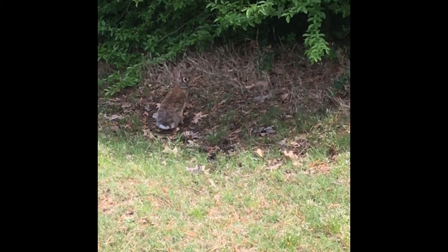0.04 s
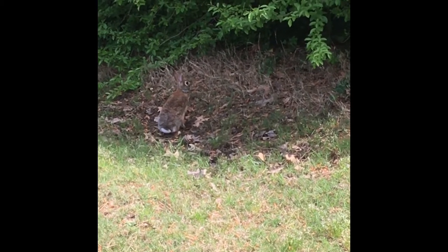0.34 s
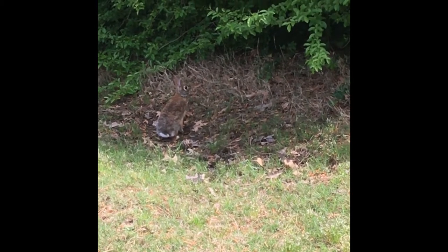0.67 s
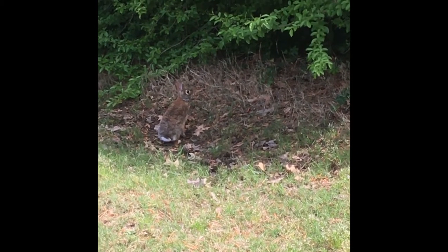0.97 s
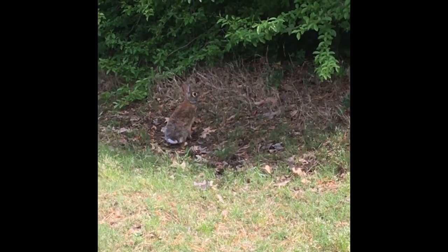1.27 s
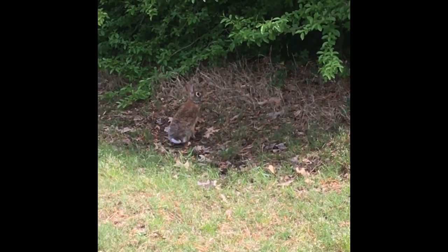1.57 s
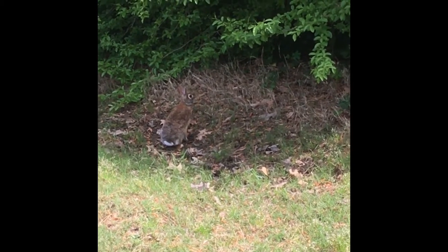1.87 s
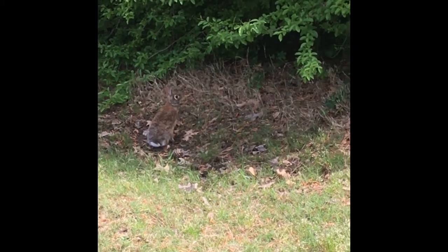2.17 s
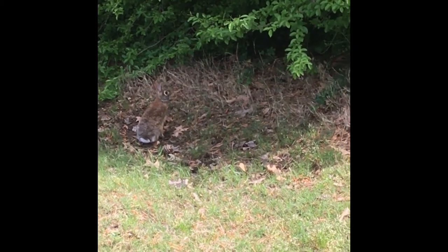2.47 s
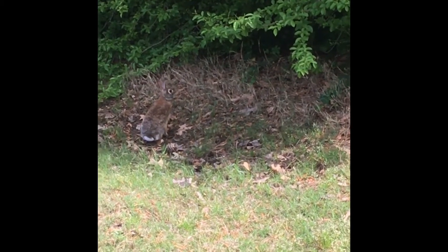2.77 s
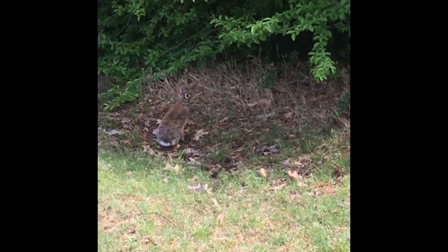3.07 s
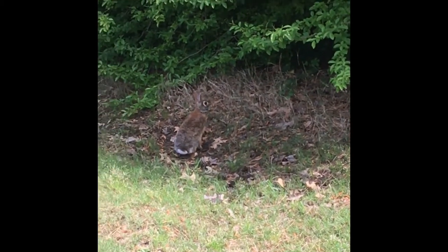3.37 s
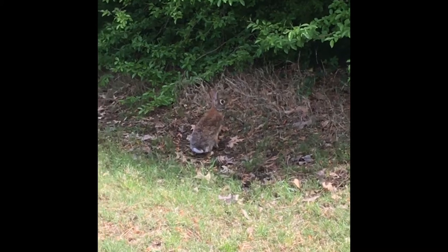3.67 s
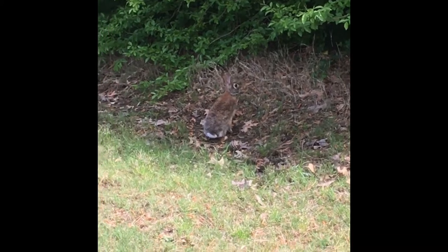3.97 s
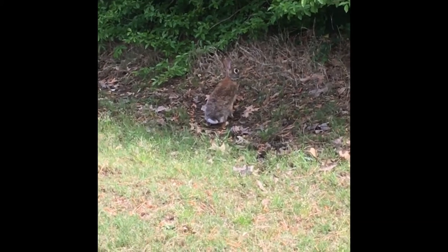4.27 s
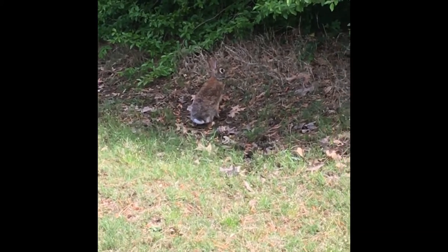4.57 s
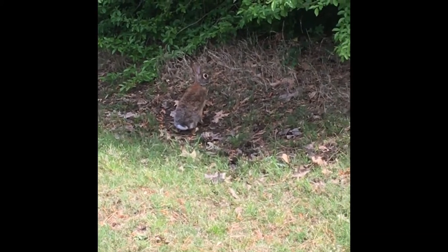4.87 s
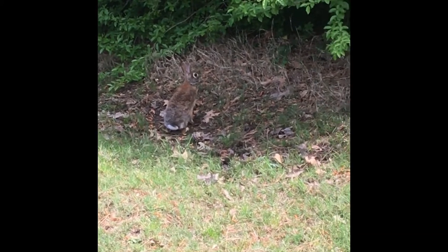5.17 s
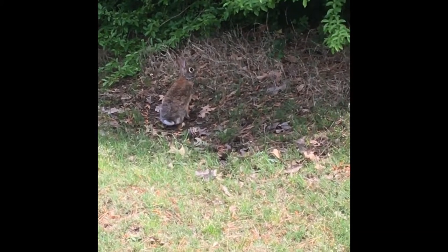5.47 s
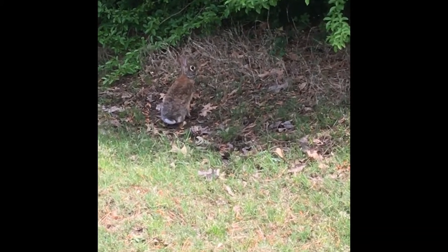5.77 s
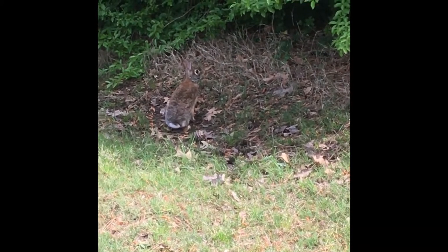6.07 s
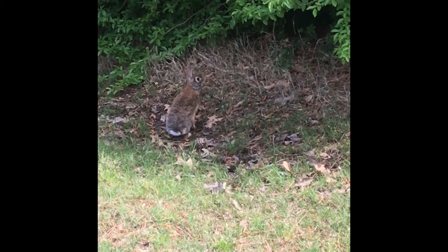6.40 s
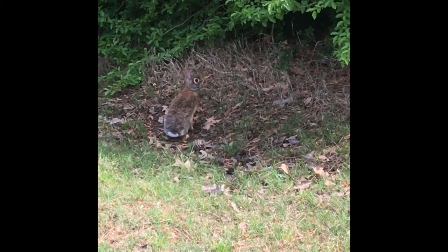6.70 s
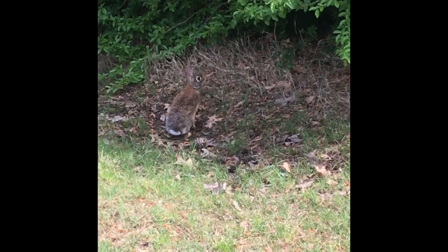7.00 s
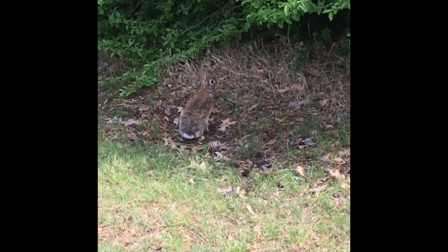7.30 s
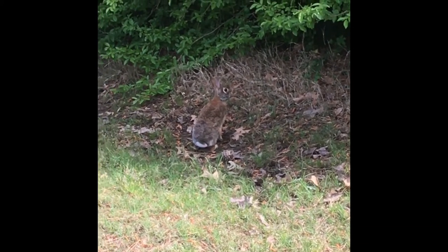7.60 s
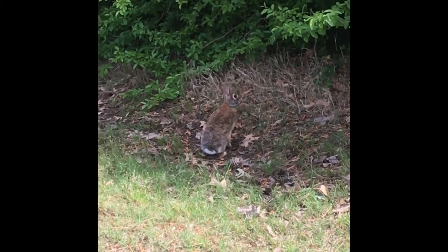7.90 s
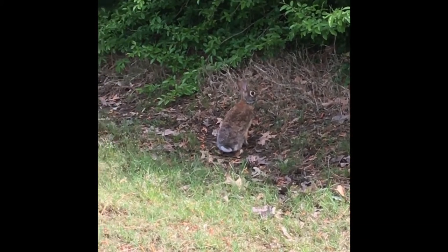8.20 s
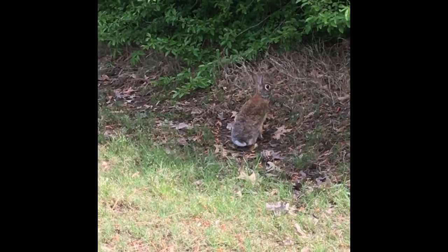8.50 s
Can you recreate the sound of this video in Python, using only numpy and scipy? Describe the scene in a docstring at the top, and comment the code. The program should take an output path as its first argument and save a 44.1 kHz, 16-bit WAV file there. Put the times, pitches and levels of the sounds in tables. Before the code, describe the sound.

A distant riding mower hums throughout, low and steady, over a soft outdoor rumble and faint hiss. From about 4.5 seconds its pitch sags slightly; it gets quieter around 6 seconds, and the pitch partly recovers by 7.3. Small birds chip, whistle and buzz faintly all along, with a slight echo from the trees. A nearer bird gives a thin, very high call at 0.5 seconds and a weaker one at 5.7. From 6 to 7 seconds another sings a quick trill of seven syllables. Close to the microphone, a wristwatch makes a small dry tick once a second, starting at 0.25 seconds. The hand holding the microphone makes soft, deep bumps in the first second and again from 2 to 4 seconds. Light finger rubbing starts at about 2.5 seconds and continues, with a few small clicks, clearest near 3, 5.2 and 7.7 seconds.

```python
"""A riding mower hums far across a garden: its blades and engine slow a little in thicker grass.
Small birds chip, whistle, buzz and trill in gliding tones, which the trees scatter.
Close by, a wristwatch ticks once a second as its second hand steps. Fingers bump and rub
the hand-held microphone, over a low rumble and a faint hiss."""
import sys
import numpy as np
from scipy import signal
from scipy.fft import rfft, irfft, next_fast_len
from scipy.io import wavfile

SR = 44100
rng = np.random.default_rng(int(sys.argv[2]) if len(sys.argv) > 2 else 0)


def unload_wav(signal):
    """Save mono or channel-first audio to the path in sys.argv[1] as 16-bit WAV at rate SR, clipped to [-1, 1]."""
    wavfile.write(
        sys.argv[1],
        SR,
        np.round(np.clip(np.atleast_2d(signal).T, -1, 1) * 32767).astype(np.int16),
    )


N = 381465
TIME = np.arange(N) / SR

# low rumble (frequency [Hz], relative level [dB])
RUMBLE_SPECTRUM = [(12, -48), (24, -14.5), (36, -8), (52, 0), (75, -2.5), (92, -7), (115, 0.5),
                   (145, -11.5), (175, -11.5), (220, -16.5), (280, -21.5), (400, -33.5), (700, -63)]
# roar of the mower deck and the open air (frequency [Hz], relative level [dB])
ROAR_SPECTRUM = [(100, -19), (330, 2.5), (480, -2), (640, 1), (780, -2), (980, 2), (1300, -2.5),
                 (1750, -7.5), (2400, -11.5), (3200, -19), (4200, -21.5), (5000, -30), (9000, -32.5)]
# microphone hiss (frequency [Hz], relative level [dB])
HISS_SPECTRUM = [(2000, -4), (4900, -7.5), (5700, 0), (6500, 3.5), (7300, -1.5), (8200, -6.5), (9300, -5.5),
                 (10000, -9), (10500, -22.5), (11400, -10.5), (12200, -12), (15800, -18)]

# fingers rubbing the housing (frequency [Hz], relative level [dB])
RUB_SPECTRUM = [(300, 0), (1100, 9), (2500, 1), (4800, -3), (6500, 2), (8200, -10.5), (9500, -11),
                (10600, -19.5), (15800, -22)]
# finger slides (start [s], length [s], level [dB], added brightness [dB per octave])
FINGER_SLIDES = [(2.56, 0.79, -67.5, -0.5), (3.347, 0.65, -74.5, 4.5), (4.58, 0.49, -75, -1),
                 (5.42, 0.75, -71.5, .5), (7.47, .42, -65, -2)]
# soft bumps of the hand (start [s], length [s], level [dB], treble cutoff [Hz])
HAND_BUMPS = [(-.08, 0.26, -40.5, 181), (.45, 0.15, -42, 80), (.778, .15, -42, 50), (2.15, 0.82, -44.5, 55),
              (2.962, 0.16, -37, 65), (3.15, 0.99, -43.5, 70)]
# clicks of the housing (time [s], peak level [dB], centre frequency [Hz])
HOUSING_CLICKS = [(2.653, -44.5, 7360), (2.888, -45, 1100), (3.031, -43, 1700), (3.394, -50.5, 4500),
                  (5.191, -44, 4200), (7.739, -40.5, 1500), (8.374, -51, 5050)]
# one watch tick (frequency [Hz], relative level [dB])
TICK_SPECTRUM = [(1500, -41), (3000, -18), (3800, -9), (4800, -25), (5600, -11), (6300, 1.5), (7700, -5),
                 (8400, -11), (9200, -10), (11000, -16), (13400, -30), (14500, -15), (16000, -23)]

# the farthest birds (pitch [Hz], notes [per s], base level [dB])
CHORUS_BIRDS = [(2315, 15, -78.5), (2680, 10, -79.5), (3400, 18, -80.5), (4040, 9, -86.5)]
# how their chorus swells and fades (time [s], added level [dB])
CHORUS_SWELL = [(0, 2.5), (1.6, -1), (2.6, -2.5), (4.5, 2), (5.3, -5), (7.2, -2.5), (8.65, 5)]
# far chips (start [s], middle pitch [Hz], fall [octaves], level [dB])
BIRD_CHIPS = [(.01, 2780, 0.32, -69.5), (.385, 3400, .35, -80), (.68, 4100, 0.16, -78),
              (1.355, 2670, .16, -73), (1.47, 2720, 0.37, -69.5), (1.605, 2580, 0.18, -74),
              (2.135, 4500, .1, -76.5), (2.213, 3500, 0.28, -72.5), (2.263, 2270, 0.11, -68),
              (2.305, 3240, 0.2, -71.5), (2.47, 2270, 0.21, -69), (3.425, 2760, 0.38, -74.5),
              (5.893, 4050, 0.47, -68), (5.998, 4070, .4, -71), (6.025, 2077, .1, -68),
              (7.822, 3050, .28, -74), (8.15, 3040, .3, -74)]
# far whistles (start [s], length [s], held pitch [Hz], start above that pitch [octaves], level [dB])
BIRD_WHISTLES = [(0.562, 0.038, 2270, 0, -70), (.79, .03, 2800, 0, -72), (.975, .05, 2240, -0.036, -70),
                 (1.622, .028, 3600, -.05, -73), (1.788, .065, 3580, -.2, -77),
                 (2.94, 0.048, 2550, -0.021, -73), (3.52, 0.087, 2260, 0.036, -71.5),
                 (3.995, 0.11, 2340, 0.18, -70.5), (4.39, .13, 3370, .19, -82),
                 (4.51, .14, 2410, 0.3, -73.5), (4.658, 0.036, 2365, .04, -63),
                 (4.842, .04, 2760, 0.019, -69.5), (4.891, .19, 2775, 0, -78.5),
                 (6.235, .16, 4440, 0.075, -72.5), (6.4, .09, 4450, 0, -82), (6.57, .13, 4320, 0, -80),
                 (7.355, 0.032, 4200, -0.021, -72), (7.468, .032, 4420, 0, -72),
                 (7.99, 0.11, 3202, 0.09, -73)]
# far buzzy calls (start [s], length [s], middle pitch [Hz], level [dB])
BIRD_BUZZES = [(0.629, .15, 2960, -73), (2.718, 0.22, 4270, -78.5), (3.249, 0.082, 3430, -74),
               (5.607, .069, 4180, -74), (7.151, 0.184, 3550, -71.5), (7.269, 0.14, 3290, -74.5),
               (8.299, 0.11, 3360, -76)]
# the notes in one syllable of the trill
# (delay [s], length [s], start pitch [Hz], middle pitch [Hz], end pitch [Hz], added level [dB])
TRILL_NOTES = [(-.005, 0.0325, 3330, 3400, 3170, -2.5), (0.013, 0.0208, 3295, 2946, 2400, 1.5),
               (0.049, .016, 2850, 2720, 2540, -4), (0.068, .032, 3530, 3957, 4130, 2),
               (.108, 0.028, 4100, 4090, 4060, -12)]
# the near bird's calls
# (start [s], length [s], base pitch [Hz], climb [share of pitch], level [dB], level change [dB])
HEDGE_CALLS = [(.519, .104, 6700, .1, -63.5, -4), (5.708, .104, 6600, 0.23, -71, -17)]

# the mower cruises, sags in thicker grass and partly recovers (time [s], blade-passing rate [Hz])
BLADE_RATE = [(0, 129.7), (4.35, 129.9), (6.7, 126.1), (7.3, 128.1), (8.65, 128.1)]
# the hum comes up, slowly recedes, then drops (time [s], level [dB])
HUM_LEVEL = [(0.0, -40.5), (0.46, -35.5), (5.59, -38), (6.24, -43.5), (8.65, -43.5)]
# sound bouncing off the ground cancels and restores the hum's octave (time [s], added level [dB])
GROUND_BOUNCE = [(0, -5), (.7, 4), (3.5, 0.5), (4.6, -1.5), (5.4, -7), (6.6, -4), (7.4, 5), (8.65, 4.5)]
# blade tones; a negative share makes a tone grow as the hum fades
# (multiple of the blade rate, base level [dB], share of the hum's fading, waver [0-1])
BLADE_TONES = [(1, -36, 1, 0.05), (2, -61, 0.74, 0.1), (3, -67.5, 0.52, 0.13), (4, -76.5, -0.094, 0.1),
               (5, -75.5, -0.51, 0.8), (6, -86, -0.13, 0.2), (7, -78, 0.21, 0.6), (8, -82.5, -.5, 0.8)]
# exhaust tones (multiple of the engine cycle, base level [dB], share of the hum's fading, waver [0-1])
EXHAUST_TONES = [(2, -47.5, .8, 0.17), (3, -57, -0.29, 0.2), (4, -71.5, -0.11, 0.4), (5, -59, -0.44, 0),
                 (6, -66, -0.42, 0.7), (8, -76.5, -0.17, 0.9), (48, -78.5, .5, 0.9), (54, -80.5, 1, 0.7)]


def amp(db):
    """Turns decibels into a gain to multiply by."""
    return 10 ** (np.asarray(db) / 20)


def unit_rms(x):
    """Scales a signal so its average strength (rms) is 1."""
    return x / np.sqrt(np.mean(abs(x) ** 2) + 1e-30)


def curve(rows):
    """Joins (time, value) rows by straight lines."""
    return np.interp(TIME, *np.transpose(rows))


def gain_at(spectrum, hz):
    """Reads a (frequency, level) table as a gain at the given frequencies."""
    f, db = np.transpose(spectrum)
    return amp(np.interp(np.log(hz + 1), np.log(f), db))


def noise(shape):
    """Noise of strength 1 whose spectrum follows shape(frequency)."""
    size = next_fast_len(N)
    spectrum = rfft(rng.standard_normal(size)) * shape(np.fft.rfftfreq(size, 1 / SR))
    return unit_rms(irfft(spectrum, size)[:N])


def drift(rate):
    """A random wobble, up to about rate changes a second."""
    return noise(lambda f: np.exp(-(f / rate) ** 2))


def band(hz, width_hz):
    """Noise gathered around one frequency."""
    return noise(lambda f: 1 / (1 + (2 * (f - hz) / width_hz) ** 2))


def swell(start, length):
    """One smooth rise and fall."""
    return np.sin(np.pi * np.clip((TIME - start) / length, 0, 1))


def note_time(length):
    """Time in seconds through a note."""
    return np.arange(int(length * SR)) / SR


def sweep(length, hz, octaves):
    """A pitch that moves evenly by so many octaves, passing hz halfway."""
    return hz * 2 ** (octaves * (note_time(length) / length - .5))


def add(mix, start, sound):
    """Mixes a sound in at a start time in seconds."""
    part = mix[max(round(start * SR), 0):][:len(sound)]
    part += sound[:len(part)]


def snap(gain, size=1024):
    """The shortest click with the spectrum gain(frequency), peaking at 1."""
    log_gain = np.log(gain(abs(np.fft.fftfreq(size, 1 / SR))) + 1e-5)
    spectrum = np.exp(np.conj(signal.hilbert(log_gain)))  # packs the energy at the start
    click = np.fft.ifft(spectrum).real
    return click / abs(click).max()


def rumble_and_roar(gust_db=.74, flutter_db=.5):
    """A low rumble swells gently under the far roar of the mower deck and the open air."""
    rumble = amp(-50 + gust_db * drift(.89)) * noise(lambda f: gain_at(RUMBLE_SPECTRUM, f))
    roar = amp(-60.5 + flutter_db * drift(16)) * noise(lambda f: gain_at(ROAR_SPECTRUM, f))
    return rumble + roar


def microphone_hiss(fizz_db=3.5, flicker_db=2.5, dip_db=-7):
    """The microphone's own fizzy hiss, with a thin whine and a flickering shimmer that dips once."""
    hiss = amp(-77 + fizz_db * drift(260)) * noise(lambda f: gain_at(HISS_SPECTRUM, f))
    whine = amp(-90) * band(5480, width_hz=27)
    in_dip = (TIME > 2.7) & (TIME < 4.25)
    flicker = amp(flicker_db * band(11, width_hz=6))
    shimmer = amp(-91.5 + dip_db * in_dip) * unit_rms(flicker * band(11370, width_hz=330))
    return hiss + whine + shimmer


def finger_rubbing(still_db=-88.5, moving_db=-73.5, moving_from_s=2.57, grain_db=4.5):
    """Fingers rub the housing in tiny slips, louder once the hand starts to move."""
    grip_db = np.where(TIME > moving_from_s, moving_db, still_db)
    rubbing = amp(grip_db) * noise(lambda f: gain_at(RUB_SPECTRUM, f))
    for start, length, db, bright_db in FINGER_SLIDES:
        rustle = noise(lambda f: gain_at(RUB_SPECTRUM, f) * amp(bright_db * np.log2(f + 20)))
        rubbing += amp(db) * swell(start, length) * rustle
    slips = amp(grain_db * np.tanh(drift(98)))
    return rubbing * slips


def hand_knocks():
    """The hand bumps the housing with deep, soft thuds and makes it click."""
    out = np.zeros(N)
    for start, length, db, top_hz in HAND_BUMPS:
        thud = noise(lambda f: (1 - np.exp(-(f / 33) ** 4)) / (1 + (f / top_hz) ** 4))
        out += amp(db) * swell(start, length) * thud
    for start, db, hz in HOUSING_CLICKS:
        click = snap(lambda f: 1 / (1 + 2.3 * np.log((f + 1) / hz) ** 2) ** 2)
        add(out, start, amp(db) * click)
    return out


def watch(first_s=.2492, every_s=1.0002, rattle_db=-18.5, rattle_s=.00072):
    """The second hand steps: one dry tick each time, with a very short rattle of the gears."""
    out = np.zeros(N)
    tick = amp(-43.5) * snap(lambda f: gain_at(TICK_SPECTRUM, f))
    t = np.arange(len(tick)) / SR
    for start in np.arange(first_s, N / SR, every_s):
        rattle = amp(rattle_db) * rng.standard_normal(len(t)) * np.exp(-t / rattle_s)
        add(out, start, tick)
        add(out, start, np.convolve(tick, rattle))
    return out


def bird_note(glide, db, buzz=0, buzz_hz=130, overtone_db=-40, rough=.013, flutter_db=3.5, taper=.36):
    """A nearly pure, slightly unsteady tone follows a pitch glide; buzz shakes its pitch and strength."""
    t = np.arange(len(glide)) / SR
    shake = np.sin(2 * np.pi * (buzz_hz * t + rng.random()))
    jitter = np.interp(t, np.arange(200) * .002, rng.standard_normal(200))
    flutter = np.interp(t, np.arange(200) * .008, rng.standard_normal(200))
    pitch = glide * (1 + buzz * shake + rough * jitter)
    phase = 2 * np.pi * np.cumsum(pitch) / SR
    tone = np.sin(phase) + amp(overtone_db) * np.sin(2 * phase)
    loudness = (1 + 8 * buzz * shake) * amp(flutter_db * flutter) * signal.windows.tukey(len(t), taper)
    return amp(db) * unit_rms(tone * loudness)


def chorus(spread_db=3, pitch_spread=.1598, glide_octaves=.405, shortest_s=.02, longest_s=.06):
    """Many faint twitters at random moments, each sliding up or down around its bird's pitch."""
    out = np.zeros(N)
    for hz, per_second, db in CHORUS_BIRDS:
        count = int(per_second * N / SR)
        for when, size, pitch, slope, loud in rng.random((160, 5))[:count]:
            length = shortest_s + (longest_s - shortest_s) * size
            middle_hz = hz * (1 + pitch_spread * (pitch - .5))
            glide = sweep(length, middle_hz, glide_octaves * (2 * slope - 1))
            add(out, when * N / SR, bird_note(glide, db + spread_db * (loud - .5)))
    return amp(curve(CHORUS_SWELL)) * out


def far_birds(chip_s=.042, settle_s=.03):
    """Chips sweep down, whistles settle on a pitch, and buzzes rise a little."""
    out = np.zeros(N)
    for start, hz, fall, db in BIRD_CHIPS:
        add(out, start, bird_note(sweep(chip_s, hz, -fall), db, rough=.022))
    for start, length, hz, slide, db in BIRD_WHISTLES:
        glide = hz * 2 ** (slide * np.exp(-note_time(length) / settle_s))
        add(out, start, bird_note(glide, db, rough=.006))
    for start, length, hz, db in BIRD_BUZZES:
        glide = sweep(length, hz, octaves=.04)
        add(out, start, bird_note(glide, db, buzz=.03, buzz_hz=129.4, rough=.028))
    return out


def trill(count=7, first_s=6.056, every_s=.1185, slowing_s=.0008, sag=.0024):
    """One bird repeats a syllable, slowing and sinking slightly in pitch, loudest in the middle."""
    out = np.zeros(N)
    for k in range(count):
        start = first_s + every_s * k + slowing_s * k ** 2
        from_middle = 2 * k / (count - 1) - 1
        syllable_db = -65.5 - 1.5 * from_middle ** 2
        sinking = 1 - sag * (k - count // 2)
        for delay, length, *pitches, db in TRILL_NOTES:
            arc = np.polyfit([0, .5, 1], pitches, 2)  # a smooth bend through the three pitches
            glide = np.polyval(arc, note_time(length) / length) * sinking
            add(out, start + delay, bird_note(glide, syllable_db + db, rough=.04, flutter_db=5))
    return out


def hedge_bird(dive=.49, dive_s=.0053):
    """Thin, buzzing calls from the near hedge: each dives quickly in pitch, then climbs as it fades."""
    out = np.zeros(N)
    for start, length, hz, climb, db, fade_db in HEDGE_CALLS:
        t = note_time(length)
        glide = hz * (1 + dive * np.exp(-t / dive_s) + climb * (t / length) ** 2)
        call = bird_note(glide, db + fade_db * (t / length - .5), buzz=.025, buzz_hz=330,
                         overtone_db=-25, rough=.014, flutter_db=2, taper=.26)
        add(out, start, call)
    return out


def trees(song, tail_db, tail_s, echo_db, echo_s=.03, build_s=.0093):
    """Leaves and trunks scatter a dying tail; the edge of the wood returns one clearer echo."""
    t = np.arange(SR) / SR
    tail = rng.standard_normal(SR) * amp(-60 * t / tail_s) * (1 - np.exp(-t / build_s))
    response = amp(tail_db) * tail / np.linalg.norm(tail)
    response[0] += 1  # the sound that arrives directly
    add(response, echo_s, amp([echo_db]))
    return signal.fftconvolve(song, response)[:N]


def birds():
    """One bird calls from the near hedge; the others sing from farther trees and echo longer."""
    return (trees(hedge_bird(), tail_db=-3, tail_s=.14, echo_db=-24)
            + trees(far_birds() + chorus(), tail_db=-2.5, tail_s=.7, echo_db=-19.5)
            + trees(trill(), tail_db=-3.5, tail_s=.56, echo_db=-14))


def mower(belt_ratio=.2133, waver_hz=3.4):
    """A belt ties blades to engine, so their tones sag together; moving air makes each tone waver."""
    blade_phase = 2 * np.pi * np.cumsum(curve(BLADE_RATE)) / SR
    fading_db = curve(HUM_LEVEL) - BLADE_TONES[0][1]  # relative to the lowest blade tone's base level
    out = np.zeros(N)
    for ratio, tones in ((1, BLADE_TONES), (belt_ratio, EXHAUST_TONES)):
        for multiple, db, share, waver in tones:
            phase = multiple * ratio * blade_phase + 2 * np.pi * rng.random()
            tone = (1 + waver * drift(waver_hz)) * np.cos(phase)
            tone += waver * drift(waver_hz) * np.sin(phase)  # nudges the pitch too
            ground_db = curve(GROUND_BOUNCE) if tones is BLADE_TONES and multiple == 2 else 0
            out += amp(db + share * fading_db + ground_db) * unit_rms(tone)
    return out


def scene():
    """All the sources meet at one microphone."""
    mix = mower() + rumble_and_roar() + microphone_hiss()
    mix += finger_rubbing() + hand_knocks() + watch() + birds()
    return mix[None]


def record(dry, low_cut_hz=38.5, high_cut_hz=15800):
    """The microphone's wind filter trims the deepest bass, and its upper limit cuts the top treble."""
    wind_filter = signal.butter(4, low_cut_hz, "highpass", fs=SR, output="sos")
    treble_filter = signal.firwin(511, high_cut_hz, window=("kaiser", 9), fs=SR)
    return signal.oaconvolve(signal.sosfilt(wind_filter, dry), treble_filter[None], "same")


dry = scene()
out = record(dry)
unload_wav(out)
```